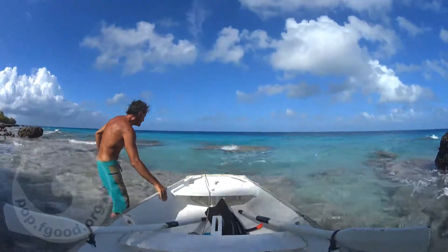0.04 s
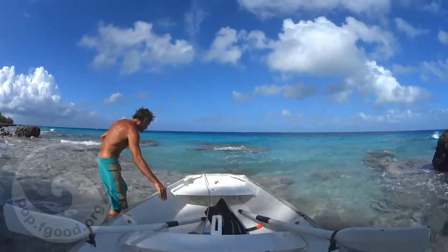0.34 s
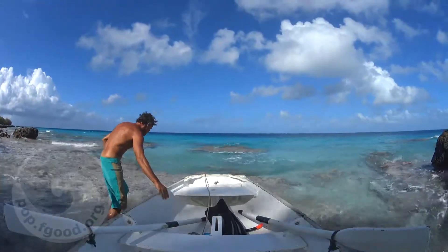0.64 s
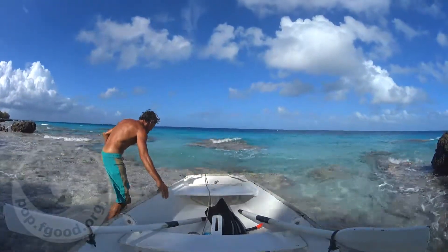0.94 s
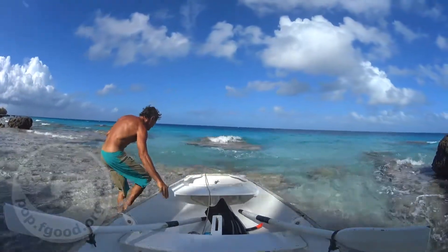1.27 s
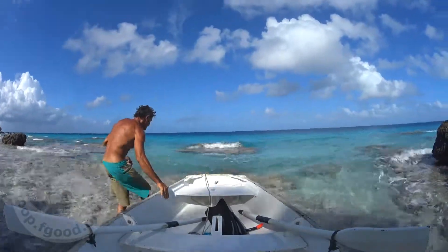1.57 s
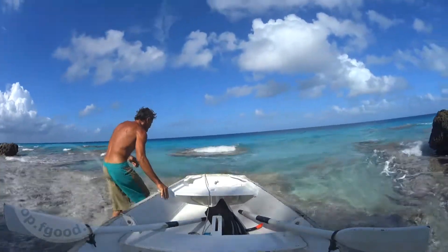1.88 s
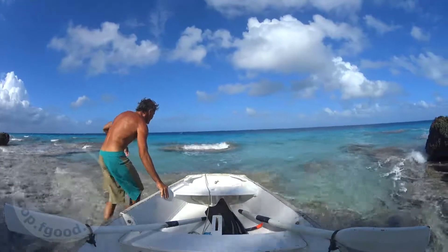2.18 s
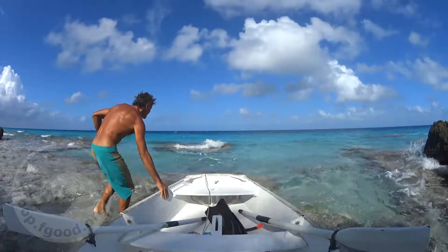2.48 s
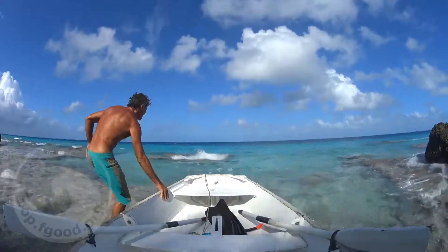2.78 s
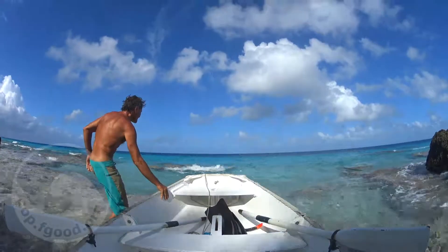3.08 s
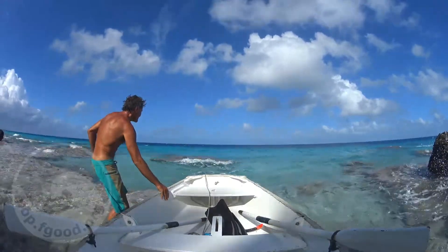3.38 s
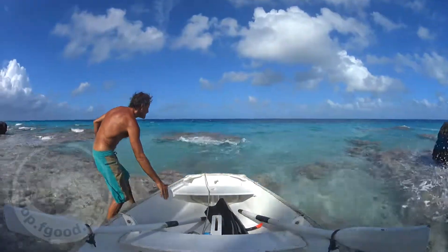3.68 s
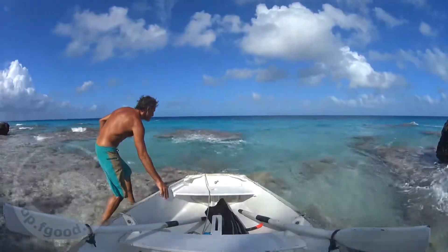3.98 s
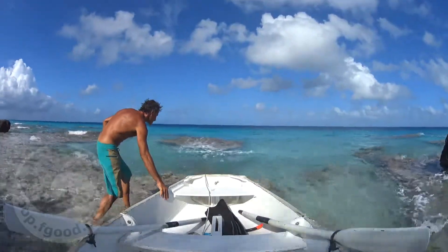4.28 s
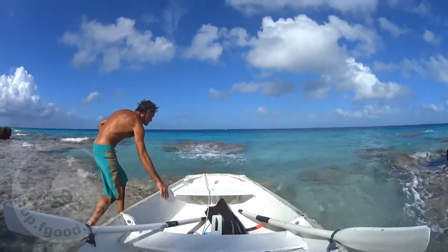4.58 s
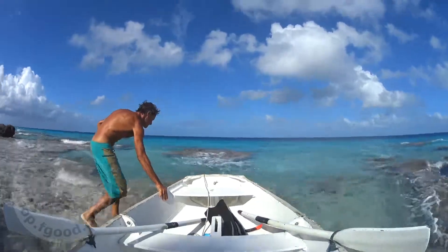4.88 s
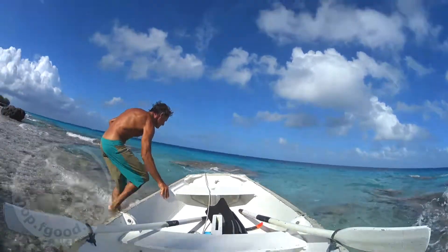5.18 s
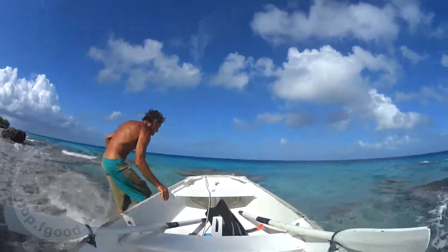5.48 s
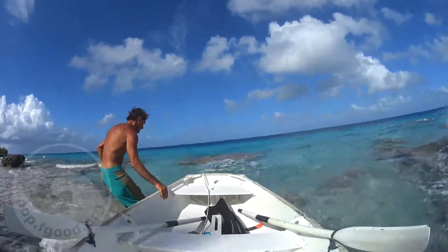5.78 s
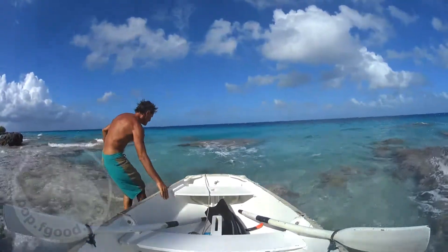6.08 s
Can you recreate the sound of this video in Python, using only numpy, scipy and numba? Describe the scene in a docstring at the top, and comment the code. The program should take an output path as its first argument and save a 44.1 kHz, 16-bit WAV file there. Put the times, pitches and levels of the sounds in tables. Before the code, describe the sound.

Gentle sea water sloshes onto a rocky shore, fizzing and gurgling as each small wave breaks and drains away.

```python
"""At the water's edge on a coral shelf, small waves wash in close to a dinghy.
Each surge traps a cloud of ringing bubbles: big ones gulp as it folds over, small ones fizz as it
drains, and spray patters back. Single bubbles pop and air pockets gurgle in the rock.
The sea murmurs further out, and a camera's electronics whine faintly."""
import sys
import numpy as np
from scipy import signal
from scipy.fft import rfft, irfft
from scipy.io import wavfile
from scipy.ndimage import uniform_filter1d
from numba import njit

SR = 44100
rng = np.random.default_rng(int(sys.argv[2]) if len(sys.argv) > 2 else 0)


def wav_out(sig):
    """Save sig, one row per channel (or a flat mono array), as 16-bit PCM at SR to the path in sys.argv[1]."""
    wavfile.write(sys.argv[1], SR, np.round(np.clip(np.atleast_2d(sig).T, -1, 1) * 32767).astype(np.int16))


N = 270774
TIME_S = np.arange(N) / SR
BINS_HZ = np.maximum(np.arange(N // 2 + 1) * SR / N, 1)


def undb(db):
    """Decibels to gain."""
    return 10 ** (np.asarray(db) / 20)


def rms(x):
    """Root mean square."""
    return np.sqrt(np.mean(x ** 2))


def over_pitch(points):
    """Join (Hz, value) points on a log-frequency axis."""
    hz, value = np.transpose(points)
    return np.interp(np.log(BINS_HZ), np.log(hz), value)


def shape(x, gain):
    """Filter by a gain for each frequency."""
    return irfft(rfft(x) * gain, N)


def walk(rate_hz):
    """Random levels, held and slewed; RMS 1."""
    hold = max(int(SR / rate_hz), 2)
    steps = rng.standard_normal(N)[np.arange(N) // hold]
    slewed = uniform_filter1d(uniform_filter1d(steps, hold), hold // 2)
    return slewed / rms(slewed)


def add(track, start_s, sound):
    """Mix a short sound in at a time."""
    start = max(int(start_s * SR), 0)
    track[start:start + len(sound)] += sound[:max(N - start, 0)]


def surge_power(arrival_s, crest_s, build_db, drain_db_per_s, front_db=25):
    """One surge, 1 at its crest: a front (steeper in short surges), a steady build, then the drain."""
    early_s, late_s = np.maximum(arrival_s - TIME_S, 0), np.maximum(TIME_S - crest_s, 0)
    rise_db = np.interp(TIME_S, [arrival_s, crest_s], [-build_db, 0])
    rise_db -= front_db * early_s / (crest_s - arrival_s)
    return undb(rise_db - drain_db_per_s * late_s) ** 2


def linger_power(arrival_s, crest_s, fade_db_per_s=0.5):
    """Foam that a surge leaves: more after a long build, and slow to fade."""
    fade = undb(-fade_db_per_s * (TIME_S - crest_s)) ** 2
    return (TIME_S > crest_s) * (crest_s - arrival_s) * fade


# Bubble sizes, big to small: gulp, babble, crackle, fizz. Each row: lead on the crest as a share of
# the build, drain speed factor, slack-water level in dB.
BUBBLE_SIZES = [(0.66, 1.2, -61.5), (0.16, 1.05, -70), (0.0035, 0.97, -67), (0.077, 0.82, -63.5)]
# Each row: arrival and crest in seconds, crackle at crest in dB, build in dB, drain in dB/s, gulp,
# babble and fizz in dB over crackle, spray in dB, bubbles over foam in dB, left minus right in dB
# on arrival and at crest.
WAVE_SURGES = [(-0.2, 0.263, -46, -7.5, 58, -6, -4, -7.5, -63.5, 0, 2, 0),
               (2.187, 2.576, -44.5, 2.5, 19, -15, -4.5, -13.5, -61.5, 2, 4.5, 3.5),
               (2.683, 2.84, -40, 2, 76, -18, -4, -10, -68, 6, -0.5, 0),
               (3.448, 3.716, -34, 6.5, 29, -12.5, -5, -11.5, -55.5, 1.5, 3.5, 2.5),
               (3.808, 4.033, -30.5, 3, 62, -12, -6.5, -7, -64, 3, 1.5, -1.5),
               (3.908, 3.935, -29.5, 0, 168, -8, -2, -4.5, -64, 0, 1, 0),
               (5.247, 5.47, -41.5, 8.5, 16, -10, -4.5, -3, -56, 0, 1, -2.5),
               (5.65, 5.863, -34.5, 5.5, 49, -12.5, -5.5, -7, -58.5, 0, -0.5, -1)]


def surf_envelopes(linger_db=-20.5, sizzle_db=-9):
    """The surges add up to dB curves: level per bubble size, spray, bubbles over foam, and pan."""
    slack_spray_db, slack_bubbly_db, linger_bubbly_db = -74, -0.5, -4.5
    size_power = [undb(slack_db) ** 2 for _, _, slack_db in BUBBLE_SIZES]
    spray_power = undb(slack_spray_db) ** 2
    weight = size_power[2]
    bubbly, pan = weight * slack_bubbly_db, 0
    for (arrival_s, crest_s, crackle_db, build_db, drain_db_per_s, gulp_db, babble_db, fizz_db,
         spray_db, bubbly_db, pan_from_db, pan_to_db) in WAVE_SURGES:
        crest_power = undb(crackle_db) ** 2
        linger = linger_power(arrival_s, crest_s)
        foam_left = undb(crackle_db + linger_db) ** 2 * linger
        for k, size_db in enumerate((gulp_db, babble_db, 0, fizz_db)):
            lead, speed, _ = BUBBLE_SIZES[k]
            peak_s = crest_s - lead * (crest_s - arrival_s)
            breaking = crest_power * surge_power(arrival_s, peak_s, build_db, drain_db_per_s * speed)
            size_power[k] = size_power[k] + undb(size_db) ** 2 * (breaking + foam_left)
        flying = surge_power(arrival_s, crest_s, 0, drain_db_per_s, front_db=45)
        spray_power = spray_power + undb(spray_db) ** 2 * (flying + undb(sizzle_db) ** 2 * linger)
        # the loudest water sets grain and pan
        surge = crest_power * surge_power(arrival_s, crest_s, build_db, drain_db_per_s)
        weight = weight + surge + foam_left
        bubbly = bubbly + surge * bubbly_db + foam_left * linger_bubbly_db
        pan = pan + surge * np.interp(TIME_S, [arrival_s, crest_s], [pan_from_db, pan_to_db])
    return 10 * np.log10(size_power), 10 * np.log10(spray_power), bubbly / weight, pan / weight


@njit
def ring_bubbles(start, hz, cycles, left, right, glide):
    """Each bubble is a damped sine; positive glide lifts its pitch as it nears the surface."""
    out = np.zeros((2, N))
    for k in range(len(start)):
        life_samples = cycles[k] * SR / hz[k]
        phasor, softening = 1 + 0j, 1.
        fade = np.exp(-4 / life_samples)
        step = np.exp(2j * np.pi * hz[k] / SR - 1 / life_samples)
        climb = np.exp(2j * np.pi * hz[k] / SR * glide[k] / (5 * life_samples))
        for i in range(start[k], min(start[k] + int(6 * life_samples), N)):
            phasor *= step
            step *= climb
            softening *= fade
            out[0, i] += left[k] * phasor.imag * (1 - softening)
            out[1, i] += right[k] * phasor.imag * (1 - softening)
    return out


def bubble_cloud(count, cycles, spread_db, glide, scatter):
    """Many faint bubbles and a few strong ones, evened out to a flat spectrum."""
    when, pitch, size, life, rise = rng.random((count, 5)).T
    start = (when * N).astype(np.int64)
    hz = 180 * (15000 / 180) ** (pitch ** .6)
    strength = undb(spread_db * np.minimum(-np.log(1 - size), 4))
    # the hull shades short wavelengths more unevenly
    side = np.clip(scatter * np.sqrt(hz / 2000), 0, 1) * rng.standard_normal(count)
    left, right = strength * (1 + side), strength * (1 - side)
    # small bubbles ring for more cycles
    ring_cycles = cycles * 2 ** (2 * life - 1) * np.cbrt(hz / 2000)
    cloud = ring_bubbles(start, hz, ring_cycles, left, right, glide * (2 * rise - .5))
    power = uniform_filter1d(np.mean(np.abs(rfft(cloud)) ** 2, axis=0), size=1501)
    cloud = shape(cloud, 1 / np.sqrt(power + power.max() / 10 ** 4))
    return cloud / rms(cloud)


def foam(flutter_db, width):
    """Countless tiny bursts merge into a hiss that comes in quick spurts."""
    mid, side = rng.standard_normal((2, N))
    side = shape(side, width * np.minimum((BINS_HZ / 2000) ** .7, 3))
    hiss = np.array([mid + side, mid - side]) * undb(flutter_db * walk(92))
    return hiss / rms(hiss)


# Band edges of the four bubble sizes in Hz.
BAND_EDGES_HZ = [170, 600, 1400, 3300, 7000]
# Each row: frequency in Hz, relative spectral level in dB.
WASH_SPECTRUM = [(100, -54), (180, -18), (250, -6.5), (420, -3), (670, -8.5), (850, -7), (1300, -5),
                 (2050, -1), (2650, -2.5), (3400, -10.5), (5200, -12), (6300, -21), (7400, -34.5),
                 (15500, -50)]


def wash(levels_db, bubbly_db):
    """Bubbles and foam swell with each surge, each size in its own time, and slosh a little."""
    cloud = bubble_cloud(count=20000, cycles=3.16, spread_db=4.0, glide=0.17, scatter=0.28)
    water = undb(bubbly_db) * cloud + foam(flutter_db=1.82, width=0.12)
    water = shape(water, undb(over_pitch(WASH_SPECTRUM)))
    highpass = [1] + [1 / (1 + (hz / BINS_HZ) ** 8) for hz in BAND_EDGES_HZ[1:-1]] + [0]
    slosh_db = 0.62 * walk(45)
    out = 0
    for k, level_db in enumerate(levels_db):
        # level each band so that only the surges set its slow rise and fall
        band = shape(water, (BINS_HZ > BAND_EDGES_HZ[k]) & (BINS_HZ < BAND_EDGES_HZ[k + 1]))
        power = np.mean(band ** 2, axis=0)
        slow_rms = np.sqrt(uniform_filter1d(uniform_filter1d(power, size=3500), size=1500))
        steady = shape(water, highpass[k] - highpass[k + 1]) / slow_rms
        out = out + undb(level_db + slosh_db) * steady
    return out


# Each row: frequency in Hz, relative spectral level in dB.
SPRAY_SPECTRUM = [(4000, -30), (6000, 14), (7200, 2.5), (8500, 2), (9500, -2.5), (10500, 2), (11500, -9),
                  (12800, -4), (15500, -33)]


def spray(level_db):
    """Tiny droplets patter back, wide across the water."""
    drops = bubble_cloud(count=5000, cycles=3.8, spread_db=0.5, glide=0.092, scatter=.3)
    hiss = undb(-0.5) * foam(flutter_db=-0.5, width=0.2)
    colour = undb(over_pitch(SPRAY_SPECTRUM)) * (BINS_HZ > SPRAY_SPECTRUM[0][0])
    patter = shape(drops + hiss, colour)
    return patter / rms(patter) * undb(level_db)


# Each row: frequency in Hz, relative spectral level in dB before the tilt.
SEA_SPECTRUM = [(15, -68), (25, -31), (140, -7.5), (204, -5.5), (331, -3.5), (648, -17.5), (826, -14.5),
                (1200, -21), (1710, -10.5), (1950, -15), (2300, -12), (3170, -17), (4500, -19), (7300, -25),
                (15500, -33)]
# Each row: frequency in Hz, left-right correlation.
SEA_CORRELATION = [(60, -0.43), (130, -0.23), (280, 0.32), (700, 0.025), (4000, -0.3), (9000, 0.12)]


def sea(mid_db, heave_db):
    """A wide murmur of far water heaves gently under an even hiss."""
    correlation = np.clip(over_pitch(SEA_CORRELATION), -1, 1)
    tilt_db = over_pitch([(150, 0.5), (400, 0.5), (1000, -1), (2500, -4.5), (5000, -3.5), (8000, 1)])
    colour = undb(over_pitch(SEA_SPECTRUM) + tilt_db)
    mid = shape(rng.standard_normal(N), colour * np.sqrt(1 + correlation))
    side = shape(rng.standard_normal(N), colour * np.sqrt(1 - correlation))
    far = np.array([mid + side, mid - side]) / rms(mid) * undb(mid_db)
    murmur = shape(far, 1 / (1 + (BINS_HZ / 2500) ** 4))
    hiss = far - murmur
    return hiss + murmur * undb(heave_db * walk(8))


def whine(hz, width_hz, level_db):
    """A faint, thin whistle from the camera's electronics."""
    tone = shape(rng.standard_normal((2, N)), 1 / (1 + ((BINS_HZ - hz) / width_hz) ** 2))
    return undb(level_db) * tone / rms(tone)


def stray_pops(crackle_db, count, over_db=5, spread_db=1.5, centre_hz=2540, octaves=0.58, cycles=1.35):
    """Rows for pops(): lesser bursts at random, as loud as the water is busy."""
    starts = rng.integers(0, N, count)
    sizes, pitches = np.clip(rng.standard_normal((count, 2)), -2, 2).T
    levels_db = crackle_db[starts] + over_db + spread_db * sizes
    hz = centre_hz * 2 ** (octaves * pitches)
    return list(zip(starts / SR, levels_db, hz, [cycles] * count))


# Each row: start in seconds, level in dB, pitch in Hz, cycles to peak.
CLOSE_POPS = [(0.1, -31.5, 4950, 1.5), (0.175, -33, 2550, 1.8), (0.231, -27.5, 2120, 1.1),
              (0.2707, -28, 1920, 1.2), (0.574, -34.5, 4200, 1.4), (1.023, -39, 5150, 2.8),
              (1.5957, -33.5, 2430, 1.7), (1.676, -44, 1770, 1.4), (1.692, -38.5, 2500, 1.1),
              (2.043, -36.5, 1620, 3.7), (2.1603, -33.5, 2600, 1.8), (2.2448, -27.5, 2660, 1.8),
              (2.277, -34, 1670, 1.9), (2.3146, -29, 2530, 2.4), (2.4214, -29, 1420, 3.9),
              (2.42, -29.5, 2750, 2), (2.540, -33, 5700, 2.9), (2.6245, -25.5, 1990, 1),
              (2.702, -25, 2580, 4.3), (2.7211, -23, 2220, 1.7), (2.7388, -26.5, 2550, 2.3),
              (2.763, -19.5, 2400, .8), (2.7918, -21.5, 1900, 2.2), (2.8245, -27.5, 2010, 6),
              (2.8653, -20, 1900, 1), (2.909, -30.5, 1960, 3.7), (2.9471, -29, 2130, 1.3),
              (3.041, -34, 2380, 1.3), (3.1775, -37, 1920, 3.2), (3.4095, -23, 2270, 0.89),
              (3.5368, -23, 1740, 2.9), (3.616, -23.5, 2400, 3.5), (3.6528, -17.5, 2440, 1.2),
              (3.791, -11.5, 2010, 1.7), (3.9078, -16, 1900, 1.2), (3.914, -18, 4940, 1.9),
              (3.9422, -9, 2000, 0.45), (4.023, -17, 5400, 1.5), (4.032, -16.5, 1960, 1.9),
              (4.1051, -12, 2240, 1.7), (4.2283, -28.5, 1380, 1.8), (4.6597, -37.5, 4300, 2.1),
              (5.2135, -34, 2270, 2.6), (5.2203, -25, 5040, 3.7), (5.301, -32, 1700, 1.6),
              (5.4352, -23, 2170, 0.45), (5.602, -16, 1800, 0.79)]


def pops(bursts, glide, splash_db, splash_s):
    """A bubble bursts: a ping of a few cycles, then a tiny splash."""
    pings, splash_gain = np.zeros((2, N))
    t = TIME_S[:SR // 20]
    splash = shape(rng.standard_normal(N), undb(over_pitch(WASH_SPECTRUM)))
    splash_envelope = (t / splash_s) * np.exp(1 - t / splash_s)
    for start_s, level_db, hz, cycles in bursts:
        age = t * hz / max(cycles, .3)
        pitch_hz = hz * (1 + glide * np.tanh((age - 1) / 4))
        envelope = (age * np.exp(1 - age)) ** 1.5
        add(pings, start_s, undb(level_db) * envelope * np.sin(2 * np.pi * np.cumsum(pitch_hz) / SR))
        thrown = min(2000 / hz, 1) ** 2  # small, high bubbles throw less water
        add(splash_gain, start_s, undb(level_db + splash_db) * thrown * splash_envelope)
    # so small a source gives no bass, and water rounds its edge
    bandpass = 1 / (1 + (280 / BINS_HZ) ** 4) / (1 + (BINS_HZ / 6500) ** 6)
    return shape(pings + splash_gain * splash / rms(splash), bandpass)


# Each row: start in seconds, glide time in seconds, pitch in Hz at start and after that time, level in dB.
AIR_POCKETS = [(0.114, .03, 920, 910, -40), (0.423, 0.043, 1224, 2080, -51), (1.128, .015, 1010, 1150, -54),
               (1.31, .04, 595, 1690, -56), (2.111, 0.041, 436, 473, -46),
               (2.115, 0.011, 1160, 1200, -38.5), (2.164, 0.059, 426, 585, -42),
               (2.307, 0.04, 457, 720, -40.5), (2.402, 0.049, 754, 1094, -42.5),
               (2.436, 0.018, 1176, 1140, -35.5), (2.494, 0.018, 537, 660, -39),
               (2.525, 0.038, 1010, 1350, -45), (2.587, 0.05, 560, 740, -45),
               (3.48, 0.018, 1140, 766, -32.5), (3.555, 0.03, 474, 445, -36),
               (3.588, 0.039, 1180, 1040, -34.5), (3.645, 0.052, 300, 226, -39),
               (3.684, 0.045, 273, 225, -33.5), (3.687, 0.013, 1180, 1040, -27),
               (3.688, 0.026, 880, 774, -27.5), (3.818, 0.02, 800, 1190, -26.5),
               (3.839, 0.009, 1470, 1220, -21), (3.91, 0.01, 777, 850, -22.5),
               (3.922, 0.017, 944, 1140, -23), (3.939, 0.012, 480, 370, -21.5),
               (3.953, 0.031, 335, 269, -34), (5.603, 0.019, 488, 452, -34.5),
               (5.604, 0.032, 296, 250, -43.5), (5.715, 0.024, 347, 397, -38)]


def gurgles(waver=0.022):
    """Air trapped in the rock rings and slides in pitch as water squeezes or opens the pocket."""
    out = np.zeros(N)
    wobble = 1 + waver * walk(200)
    for start_s, glide_s, from_hz, to_hz, level_db in AIR_POCKETS:
        age = TIME_S[:int(2 * glide_s * SR)] / glide_s
        pitch_hz = from_hz * (to_hz / from_hz) ** np.minimum(age, 1.2)
        pitch_hz *= wobble[int(start_s * SR):][:len(age)]
        envelope = (4 * age * np.exp(1 - 4 * age)) ** 1.5
        add(out, start_s, undb(level_db) * envelope * np.sin(2 * np.pi * np.cumsum(pitch_hz) / SR))
    return out


def scene():
    """Near water moves from side to side with each wave; spray and sea lie all round."""
    levels_db, spray_db, bubbly_db, pan_db = surf_envelopes()
    near = wash(levels_db, bubbly_db) + gurgles()
    around = spray(spray_db) + sea(mid_db=-56, heave_db=.5)
    bursts = CLOSE_POPS + stray_pops(crackle_db=levels_db[2], count=36)
    near += pops(bursts, glide=0.014, splash_db=-17, splash_s=0.0031)
    pan_gain = undb(np.array([pan_db, -pan_db]) / 2)
    return near * pan_gain + around + whine(hz=7900, width_hz=41, level_db=-76.5)


def record(dry):
    """A steep low-pass cuts the top treble."""
    cutoff_hz = 15600
    return signal.sosfilt(signal.ellip(10, .2, 70, cutoff_hz, fs=SR, output="sos"), dry)


dry = scene()
out = record(dry)
wav_out(out)
```